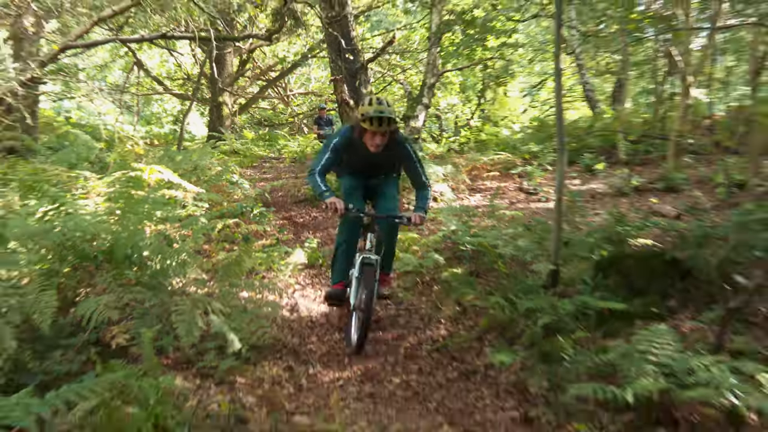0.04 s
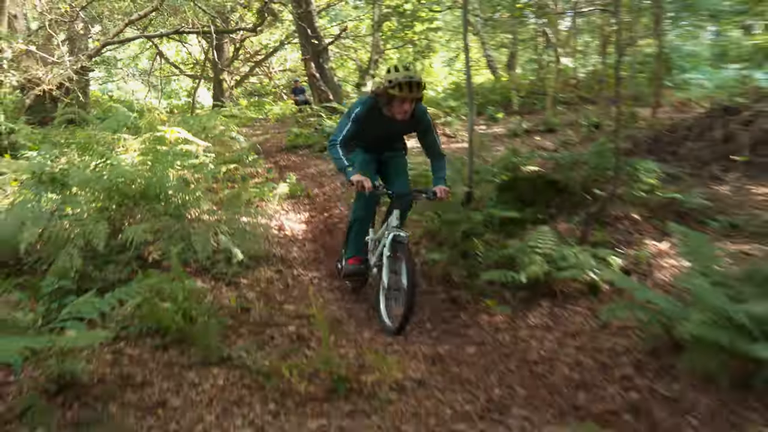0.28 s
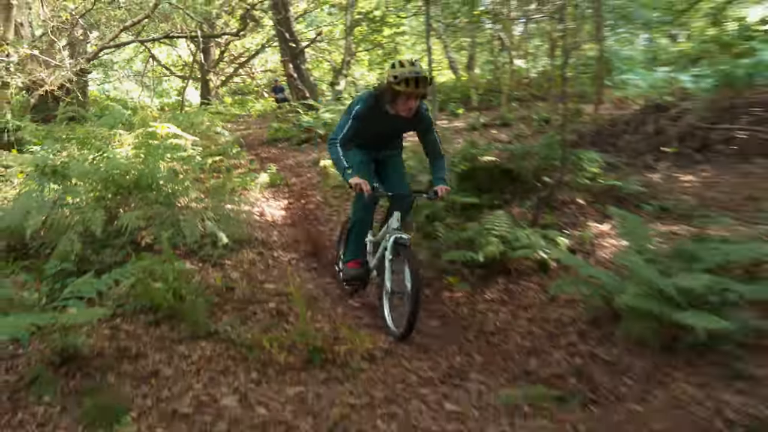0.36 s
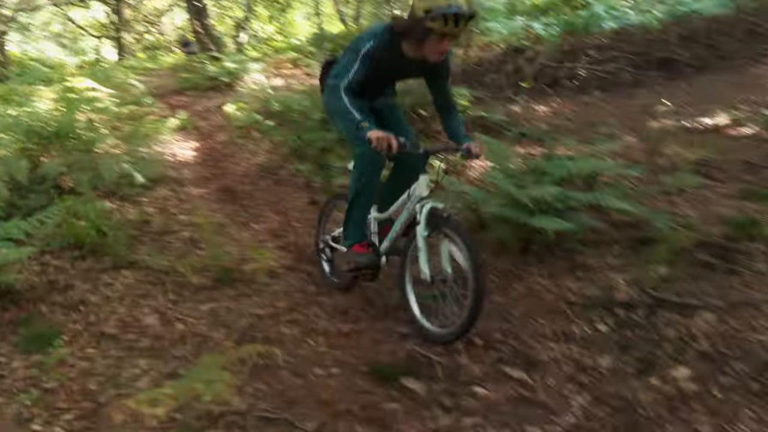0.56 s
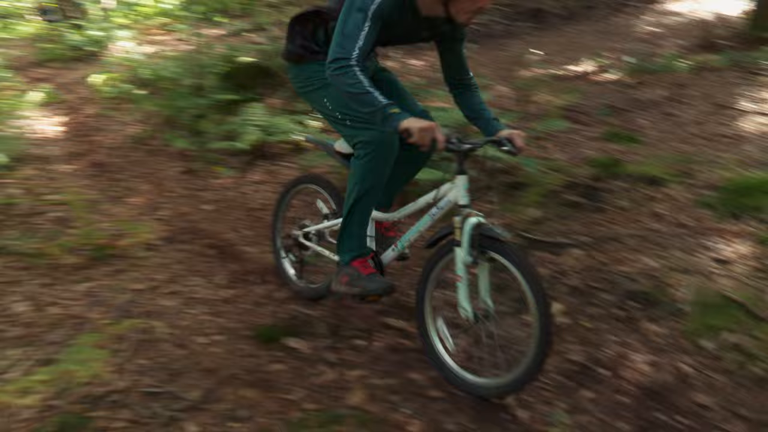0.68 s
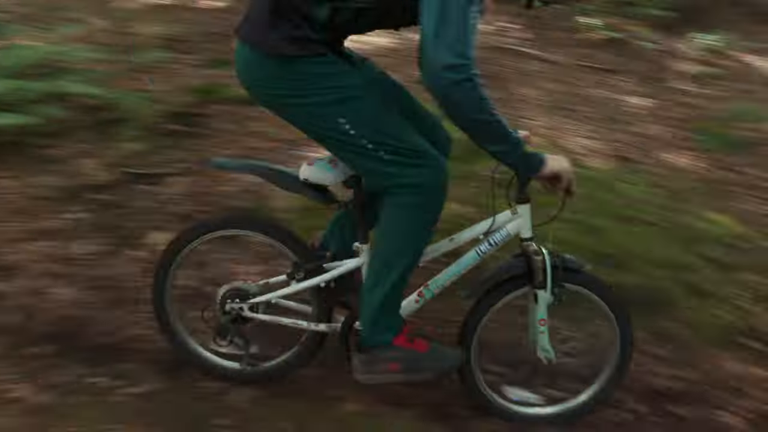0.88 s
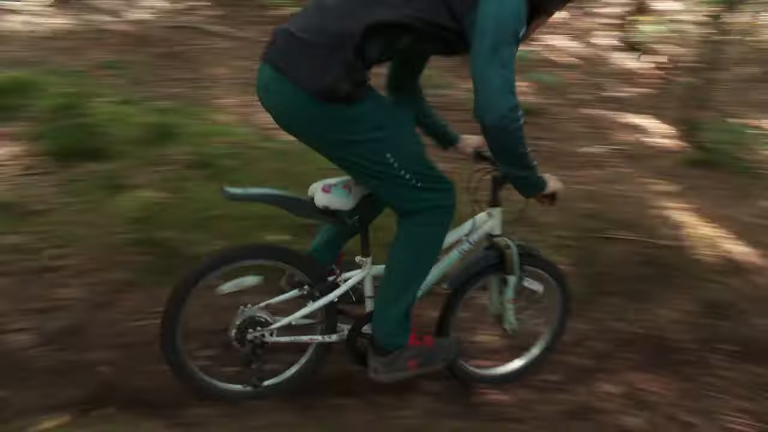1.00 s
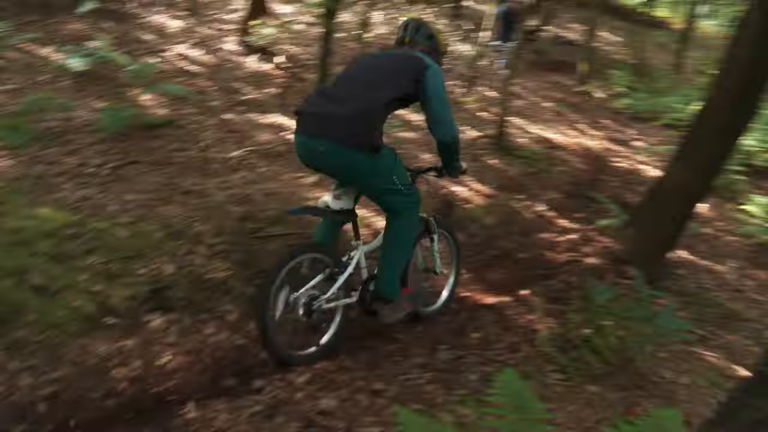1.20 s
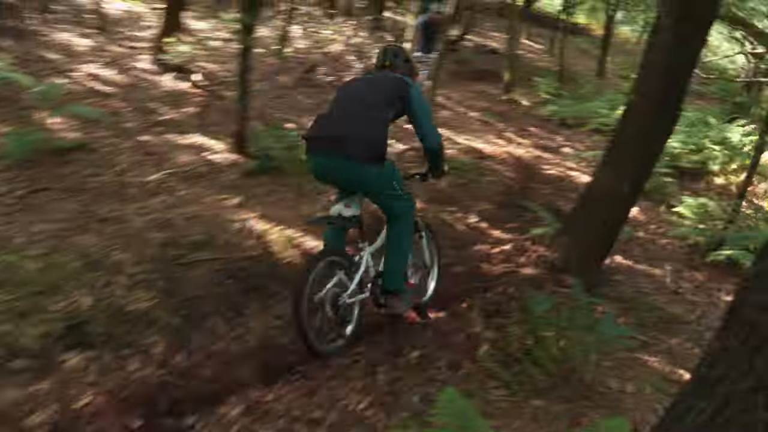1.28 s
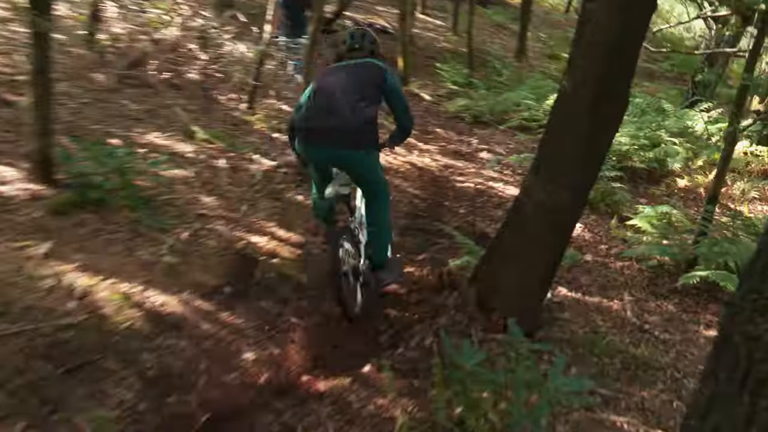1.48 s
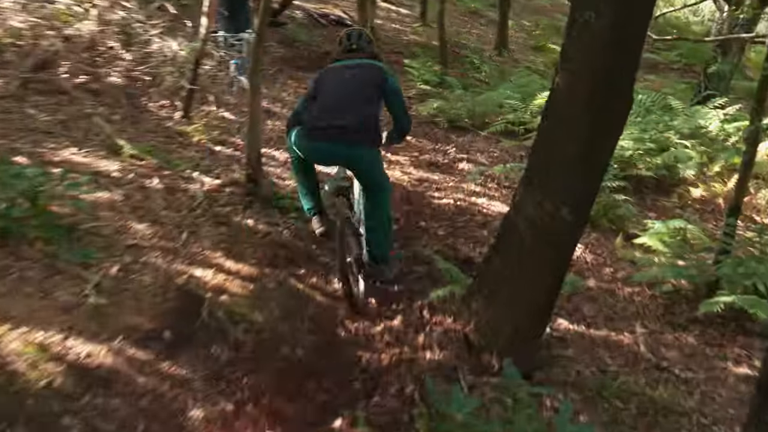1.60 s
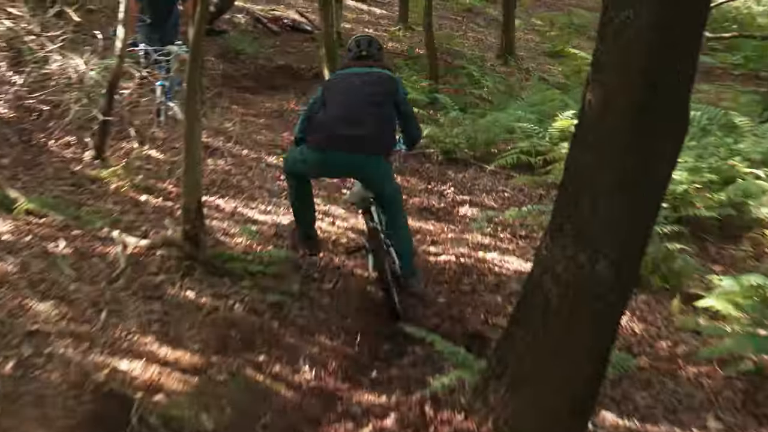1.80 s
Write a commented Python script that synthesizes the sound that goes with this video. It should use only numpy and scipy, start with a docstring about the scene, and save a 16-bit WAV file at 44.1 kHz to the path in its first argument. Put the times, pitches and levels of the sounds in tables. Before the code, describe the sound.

A small bicycle rolls close past over dry leaves, snapping twigs, its freewheel ticking.

```python
"""A rustle of dry leaves swells as a small bicycle coasts past, close to the microphone, on a
woodland dirt trail. The tyres crush leaves and grit, snap twigs, thud over bumps and scuff briefly
in the turn. The chain rattles at the jolts, and the freewheel's pawls tick over the ratchet as the
bicycle rolls away. Trunks and ground return a faint, short scatter."""
import sys
import numpy as np
from scipy import signal
from scipy.io import wavfile
from scipy.ndimage import uniform_filter1d

SR = 44100
rng = np.random.default_rng(int(sys.argv[2]) if len(sys.argv) > 2 else 0)


def to_wav(s):
    """Save 16-bit WAV."""
    ch = np.atleast_2d(s).T  # columns
    pcm = np.round(np.clip(ch, -1, 1) * 32767)  # PCM
    wavfile.write(sys.argv[1], SR, pcm.astype(np.int16))


N = 81585
T = np.arange(N) / SR

# Low rolling of the tyres on the soil, heard from the trailside (time [s], level [dB])
ROLL_LEVEL = [(0, -62), (.13, -57), (.33, -58.5), (.5, -53.5), (.56, -55), (.72, -51.5), (.81, -51),
              (.87, -48.5), (1.03, -53), (1.24, -54), (1.3, -58.5), (1.37, -57.5), (1.5, -57.5),
              (1.69, -62), (1.73, -64.5), (1.85, -51.5)]


def amp(db):
    """Decibels to gain."""
    return 10 ** (np.asarray(db) / 20)


def unit(x):
    """Scales to rms 1."""
    return x / np.sqrt(np.mean(x ** 2) + 1e-20)


def curve(rows, axis=1):
    """One column of a time table at every sample."""
    rows = np.array(rows)
    return np.interp(T, rows[:, 0], rows[:, axis])


def add(mix, s, sound):
    """Lays a sound into the mix at time s."""
    part = mix[max(round(s * SR), 0):][:len(sound)]
    part += sound[:len(part)]


def colour(x, points):
    """Causal filter through (frequency [Hz], gain [dB]) points; the result has rms 1."""
    hz, db = np.transpose(points)
    bin_hz = abs(np.fft.fftfreq(2048, 1 / SR)) + 1
    log_gain = np.log(amp(np.interp(np.log(bin_hz), np.log(hz), db)))
    taps = np.fft.ifft(np.exp(np.conj(signal.hilbert(log_gain)))).real
    return unit(signal.fftconvolve(x, taps)[:len(x)])


def resonate(x, hz, q):
    """One resonance with gain 1 at its centre, which is capped at SR / 4."""
    return signal.lfilter(*signal.iirpeak(min(hz, SR / 4), max(q, 1), SR), x)


def grains(per_s, spread_db):
    """Random tiny impulses; a positive spread makes a few stand out."""
    size = amp(spread_db * np.minimum(rng.exponential(1, N), 4.5))
    return size * rng.choice([-1, 1], N) * (rng.random(N) < per_s / SR)


def flicker(depth_db, clump_s=0.013):
    """Uneven ground makes the grains come in clumps."""
    width = int(clump_s * SR)
    clumps = uniform_filter1d(rng.standard_normal(N), width)
    return amp(depth_db * unit(uniform_filter1d(clumps, width // 2)))


def swell(s, rise_s, fall_s):
    """Exponential rise to a peak at s, then exponential fall."""
    return np.exp(-np.where(T < s, (s - T) / rise_s, (T - s) / fall_s))


def woodland(x, level_db=-14.5, t60_s=0.086, echoes_per_s=2000):
    """The direct sound plus a faint, short scatter from trunks and ground."""
    t = T[:SR // 2]
    echoes = rng.standard_normal(len(t)) * (rng.random(len(t)) < echoes_per_s / SR) * (t > .004)
    tail = echoes * np.exp(-np.log(1000) * t / t60_s)
    return x + amp(level_db) * signal.fftconvolve(x, tail / np.linalg.norm(tail))[:N]


def knocks():
    """Small stones and roots tap the hollow tyre at random, 8.5 dB below the rolling."""
    taps = resonate(grains(per_s=100, spread_db=-3), hz=665, q=4.2)
    return unit(resonate(taps, hz=665, q=1)) * amp(curve(ROLL_LEVEL) - 8.5)


def freewheel(ring_hz=6600, ring_decay_s=.0028, detune=.048, scatter_db=1.4):
    """The pawls drop over one ratchet tooth after another: a bright tick and a tiny steel ring."""
    # Ratchet speed (time [s], rate [ticks/s])
    tick_rate = [(.95, 98), (1.13, 92), (1.165, 64), (1.2, 82), (1.225, 76), (1.28, 94), (1.36, 72),
                 (1.5, 81), (1.555, 64), (1.615, 113), (1.66, 78), (1.7, 46), (1.78, 78)]
    # The hub moving away from the microphone (time [s], tick level [dB], ring level [dB])
    hub_level = [(.95, -38, -52), (1.07, -36.5, -50), (1.15, -36.5, -49), (1.29, -39.5, -47),
                 (1.38, -42, -47), (1.49, -45, -46.5), (1.56, -45, -43), (1.68, -47.5, -44.5),
                 (1.85, -50, -51)]
    # Spectrum of a tick (frequency [Hz], gain [dB])
    tick_colour = [(500, -22), (2000, -14), (4000, -7), (5400, -3), (6700, -1), (8200, -3), (9800, 0),
                   (12500, -2), (16000, -6)]
    teeth = np.cumsum(curve(tick_rate)) / SR
    teeth = np.floor(teeth - np.interp(1.2893, T, teeth))  # one drop falls at 1.2893 s
    drops = np.diff(teeth, prepend=teeth[0]) * (T > tick_rate[0][0])
    drops *= amp(scatter_db * rng.standard_normal(N))
    tick_shape = swell(T[N // 2], rise_s=.0009, fall_s=.0022)
    envelope = signal.fftconvolve(drops * amp(curve(hub_level)), tick_shape, "same")
    out, t = envelope * colour(rng.standard_normal(N), tick_colour), T[:SR // 40]
    rings = drops * amp(curve(hub_level, axis=2))
    pitches = ring_hz * (1 + detune * rng.standard_normal(N))
    for at, hz in zip(np.flatnonzero(drops), pitches):
        add(out, at / SR, rings[at] * np.sin(2 * np.pi * hz * t) * np.exp(-t / ring_decay_s))
    return out


def chain():
    """Links clash in tight bright clusters when the bicycle jolts, and the frame rings faintly."""
    # Chain rattles (peak time [s], level [dB], resonance [Hz])
    rattles = [(0.93, -25, 7140), (0.942, -19, 5200), (0.9581, -29.5, 3440), (0.9918, -17.5, 6200),
               (1.048, -36, 12000), (1.0735, -38, 9900), (1.138, -29.5, 5230), (1.4409, -31, 10000)]
    # Spectrum of clashing links (frequency [Hz], gain [dB])
    link_colour = [(100, -22), (350, -2), (1000, -2), (2200, -5), (3400, 0.5), (4900, 4), (6200, -6.5),
                   (7700, 3.5), (12000, -1), (16000, -8)]
    # Frame modes (frequency [Hz], level relative to the rattle [dB], T60 [s])
    frame_modes = [(1550, -36, .08), (2600, -32, .1), (3418, -27, .13), (3844, -33, .1), (4527, -26, .06),
                   (4900, -25, .04)]
    out, t = np.zeros(N), T[:SR // 4]
    clash = colour(rng.standard_normal(N), link_colour)
    for s, db, hz in rattles:
        links = unit(clash + 0.72 * unit(resonate(clash, hz, q=6.4)))
        out += amp(db) * swell(s, rise_s=.0013, fall_s=.002) * links
        for mode_hz, mode_db, t60 in frame_modes:
            mode = np.sin(2 * np.pi * (mode_hz * t + rng.random()))
            add(out, s, amp(db + mode_db) * mode * np.exp(-np.log(1000) * t / t60))
    return out


def thuds(rise_s=.0008, sag=.1):
    """Each bump rings the tyre with a sagging pitch; loose soil blurs it into a grainy thump."""
    # Bumps in the trail (time [s], level [dB], pitch [Hz], decay [s], soil looseness [0-1])
    bumps = [(.038, -46, 527, 0.0054, 0.1), (.092, -43.5, 548, 0.0065, 0.3), (.128, -42, 627, .003, 0.4),
             (.191, -39, 592, 0.008, 0.6), (0.228, -35.5, 670, 0.0051, 0.5), (.229, -43.5, 262, 0.014, 0.3),
             (.263, -38.5, 580, 0.006, 0.54), (.515, -39.5, 670, 0.0043, .5),
             (0.536, -47, 210, 0.019, 0.99), (.615, -28.5, 674, 0.0036, 0.52),
             (.644, -32.5, 700, 0.0087, 0.85), (.645, -38.5, 304, 0.0091, 0.85),
             (.724, -38, 755, 0.0085, 0.14), (.941, -35.5, 339, 0.013, 0.63),
             (.991, -41.5, 315.6, 0.024, 0.72), (1.0858, -38, 916, .004, 0.9), (1.322, -50, 258, 0.036, .5),
             (1.4226, -33, 648, 0.0044, .8), (1.424, -36.5, 1480, 0.0051, 0.1),
             (1.423, -36.5, 274, 0.015, 0.78), (1.439, -40, 460, 0.0053, 0.5),
             (1.511, -43, 260, 0.017, 0.38), (1.719, -40.5, 650, 0.0058, 0.35),
             (1.726, -48.5, 263, 0.019, 0.54), (1.842, -42, 640, 0.013, 0.3)]
    out, t = np.zeros(N), T[:SR // 5]
    for s, db, hz, decay, loose in bumps:
        soil = unit(resonate(resonate(rng.standard_normal(len(t)), hz, q=1.3), hz, q=1.3))
        fade = np.exp(-t / decay)
        pitch = hz * (1 + sag * (2 * fade - 1))
        ring = np.sin(2 * np.pi * np.cumsum(pitch) / SR)
        thump = np.sqrt(1 - loose ** 2) * ring + loose * soil
        add(out, s, amp(db) * thump * (1 - np.exp(-t / rise_s)) * fade)
    return out


def scuffs():
    """Short slides tear through many leaves at once."""
    # Slides on loose litter (peak time [s], level [dB], rise [s], fall [s])
    slides = [(0.041, -52, 0.0086, 0.0077), (0.311, -44, 0.0044, 0.0056), (0.361, -46, 0.0056, 0.016),
              (0.418, -38, 0.0022, 0.0059), (0.649, -38.5, 0.0064, 0.018), (0.831, -29, 0.0013, 0.01),
              (0.849, -23, 0.0056, 0.0095), (1.585, -44, 0.007, 0.004), (1.737, -45, 0.018, 0.02)]
    # Spectrum of tearing leaves (frequency [Hz], gain [dB])
    tear_colour = [(60, -48), (250, -2), (500, -9.5), (750, 3.5), (1600, -1), (2100, -5), (5000, -0.5),
                   (8500, 2), (12000, -1.5), (16000, -9)]
    envelope = sum(amp(db) * swell(s, rise, fall) for s, db, rise, fall in slides)
    return envelope * colour(grains(per_s=8000, spread_db=2.5), tear_colour)


def snaps(splinter_s=.003, low_cut_hz=630):
    """Twigs and stones crack under the tyres, then splinter briefly in one broad resonance."""
    # Fractures (time [s], relative level [dB], ring pitch [Hz], ring decay [cycles])
    fractures = [(.109, -24.5, 2820, 1), (.136, -31.5, 2570, 1.3), (0.2282, -22, 5260, 1),
                 (0.3152, -29, 10000, 1.5), (0.383, -30.5, 2770, 1.5), (0.4084, -19.5, 2480, 0.73),
                 (0.429, -26, 5400, 1.5), (0.546, -30, 4130, 1.2), (0.6012, -26, 2730, 1.4),
                 (0.6078, -31, 2600, 1.1), (0.6146, -22, 2600, 0.68), (0.6331, -24, 2800, 1.4),
                 (0.6389, -19, 2900, 0.54), (0.6427, -26, 2640, 0.79), (0.7377, -17, 8100, 1.3),
                 (0.7734, -20, 2800, 1.9), (0.798, -22, 11000, 1.5), (0.849, -25, 8100, 1.5),
                 (.928, -15.5, 2830, 2.1), (0.955, -22, 1390, 2.2), (.989, -18.5, 2540, 1.9),
                 (1.0862, -18.5, 1450, 1.5), (1.226, -34, 1600, 2.5), (1.2547, -34.5, 1390, 1.1),
                 (1.4182, -30.5, 1480, 2.1), (1.4234, -26, 2880, 0.55), (1.533, -36, 3700, 1.3),
                 (1.7461, -36, 3000, 1.1), (1.754, -30, 2740, 0.63), (1.843, -37, 2300, 0.92)]
    out, t = np.zeros(N), T[:SR // 20]
    for s, db, hz, cycles in fractures:
        band = resonate(rng.standard_normal(len(t)), hz, q=1.6 * cycles)
        splinters = unit(resonate(band, hz, q=1)) * np.exp(-t / splinter_s)
        crack = np.sin(2 * np.pi * hz * t + np.pi / 4) * np.exp(-t * hz / cycles)
        add(out, s, amp(db) * (.18 * splinters + .76 * crack))
    return signal.sosfilt(signal.butter(2, low_cut_hz, "high", fs=SR, output="sos"), out)


def tyres():
    """Tyres roll close past the microphone, crushing leaves and grit and drumming on the soil."""
    # Leaf rustle and grit crunch along the pass (time [s], relative level [dB])
    leaf_level = [(0, -54.5), (.04, -53), (.08, -53.5), (.13, -50.5), (.285, -52.5), (.36, -48.5),
                  (.52, -45), (.62, -39), (.74, -41), (.785, -41.5), (.89, -36.5), (.98, -42),
                  (1.055, -47.5), (1.1, -40.5), (1.16, -47), (1.31, -52.5), (1.45, -52), (1.56, -53),
                  (1.585, -41.5), (1.605, -54), (1.69, -60), (1.78, -54.5), (1.85, -54.5)]
    grit_level = [(0.0, -67), (0.148, -59), (0.308, -64), (0.406, -51.5), (.52, -52.5), (.64, -46),
                  (.69, -47), (0.802, -47.5), (0.88, -41), (.96, -42.5), (1.082, -44.5), (1.236, -55),
                  (1.54, -57.5), (1.752, -64), (1.85, -54.5)]
    # Spectra of leaves, grit and soil under the tread (frequency [Hz], gain [dB])
    leaf_colour = [(800, -38.5), (2500, -6), (4000, -1.5), (5500, 4.5), (7500, 4.5), (10200, 7.5),
                   (13000, 0.5), (16000, -15)]
    grit_colour = [(300, -27), (800, 2), (1050, -1), (1600, 5.5), (2000, -2.5), (2600, -0.5), (4000, -1),
                   (9000, -8)]
    soil_colour = [(20, -97), (40, -54.5), (60, -7.5), (90, -11), (160, -3.5), (270, 3), (450, -4),
                   (700, 1), (1050, -12), (2500, -21)]
    leaves = colour(grains(per_s=6500, spread_db=4), leaf_colour) * flicker(depth_db=1.38)
    grit = colour(grains(per_s=2500, spread_db=1), grit_colour) * flicker(depth_db=3.5)
    soil = colour(grains(per_s=1600, spread_db=2), soil_colour) * flicker(depth_db=1.87)
    return (leaves * amp(curve(leaf_level))
            + grit * amp(curve(grit_level) - 0.5)
            + soil * amp(curve(ROLL_LEVEL)))


def scene():
    """The whole bicycle among the trees, in mono from beside the trail."""
    return woodland(tyres() + knocks() + scuffs() + snaps() + thuds() + chain() + freewheel())[None]


def record(dry):
    """The microphone's bass cut and the recorder's band limit."""
    low_cut_hz, edge_hz = 45, 15900
    thin = signal.sosfilt(signal.butter(2, low_cut_hz, "high", fs=SR, output="sos"), dry)
    band_limit = signal.firwin(401, edge_hz, window=("kaiser", 8), fs=SR)
    return signal.oaconvolve(thin, band_limit[None], "same")


dry = scene()
out = record(dry)
to_wav(out)
```